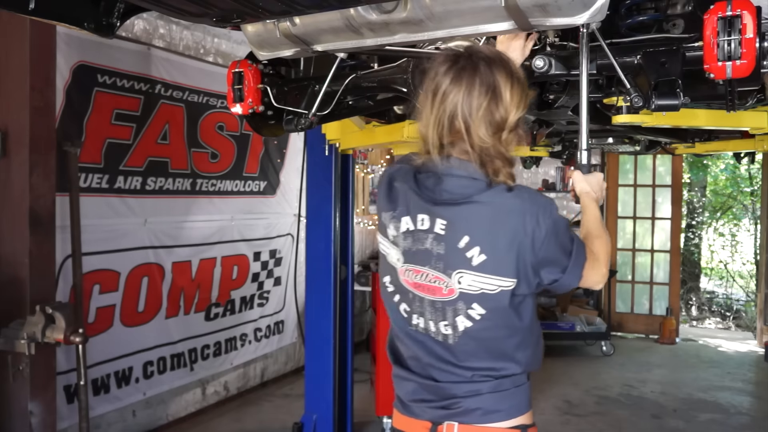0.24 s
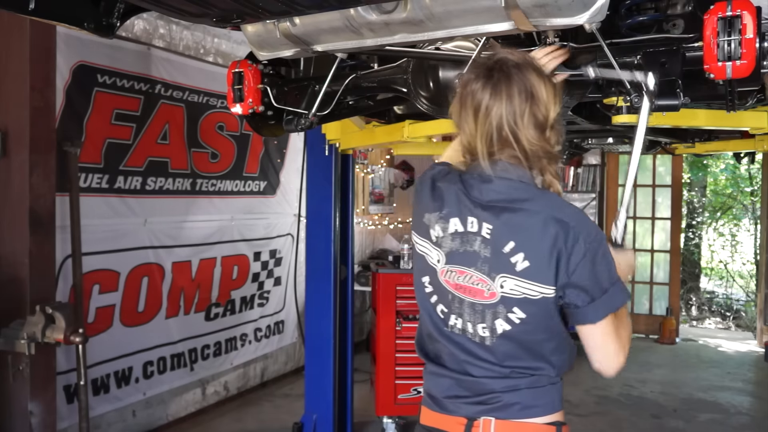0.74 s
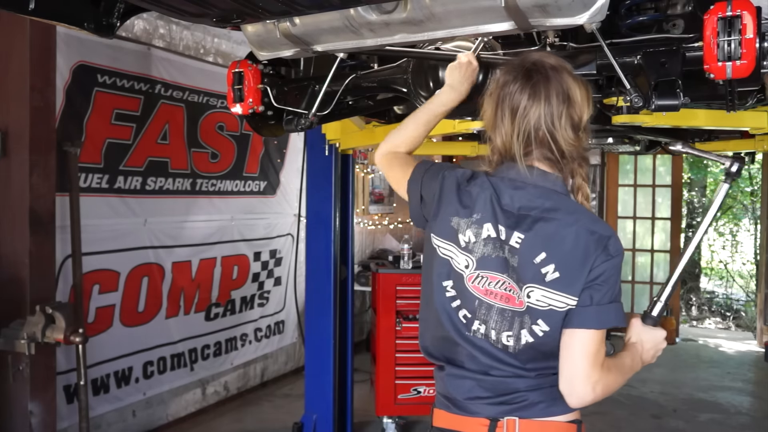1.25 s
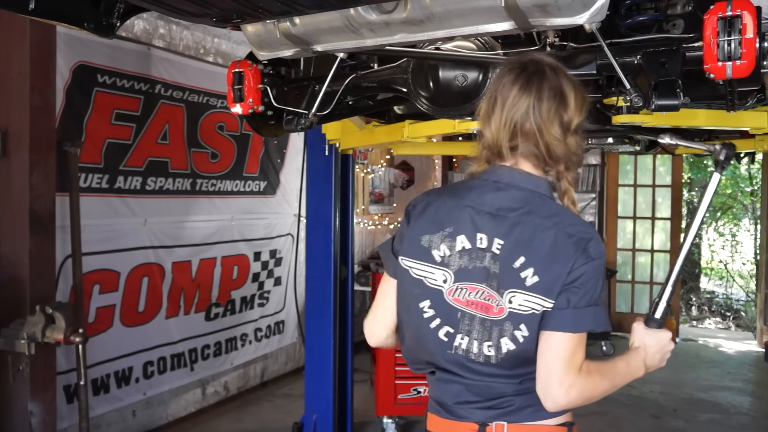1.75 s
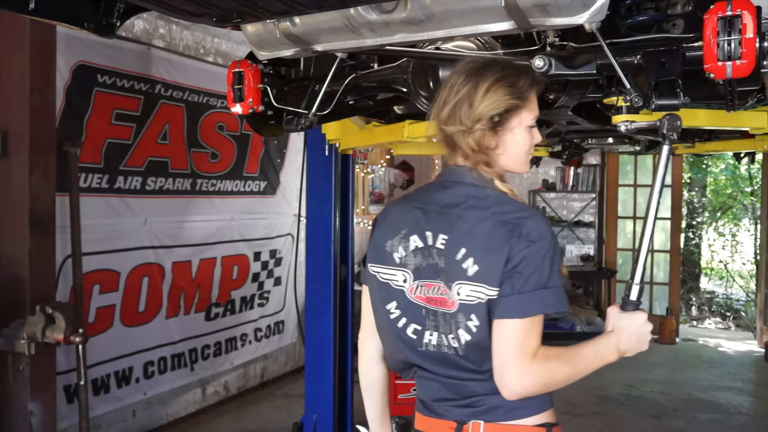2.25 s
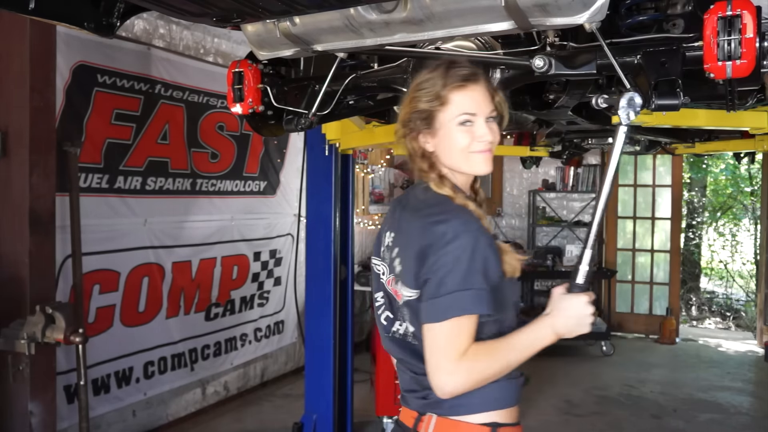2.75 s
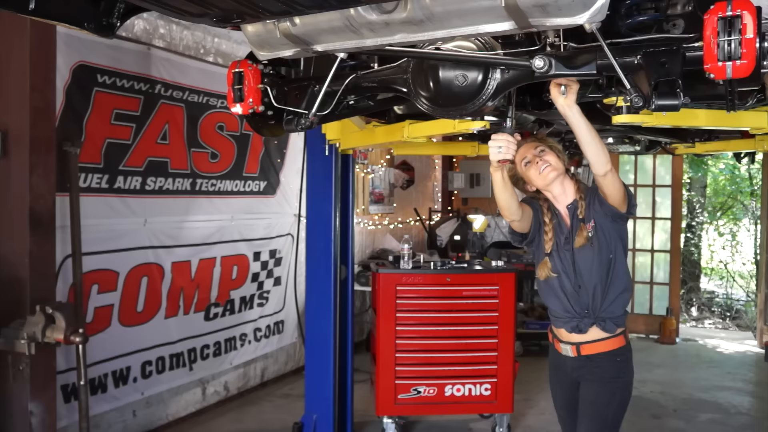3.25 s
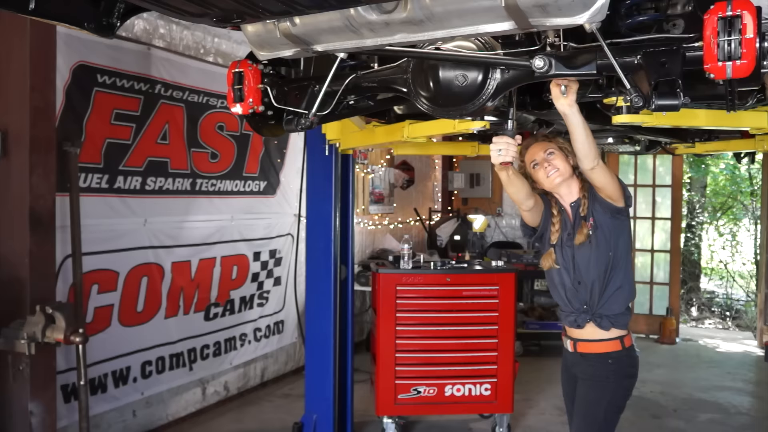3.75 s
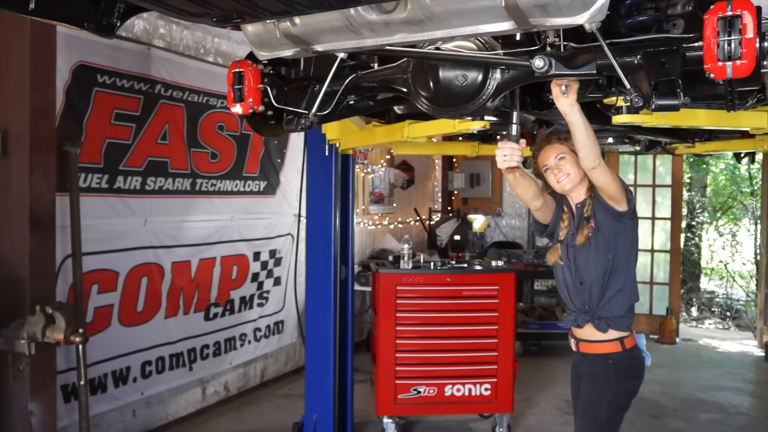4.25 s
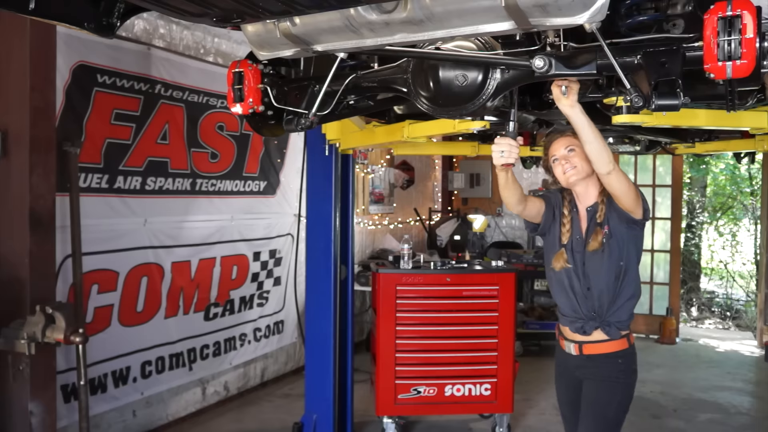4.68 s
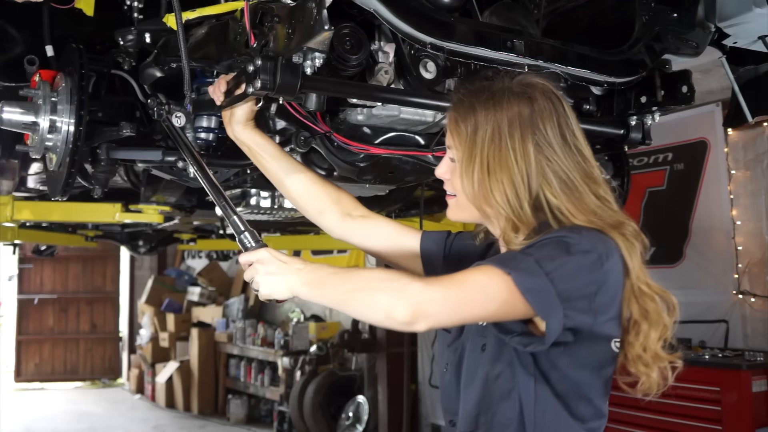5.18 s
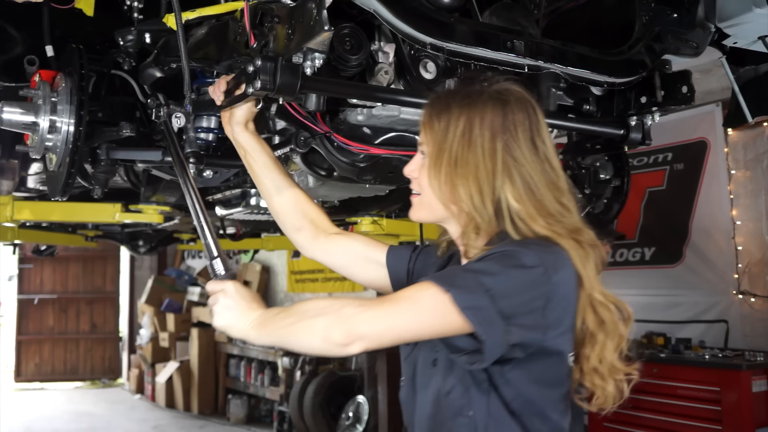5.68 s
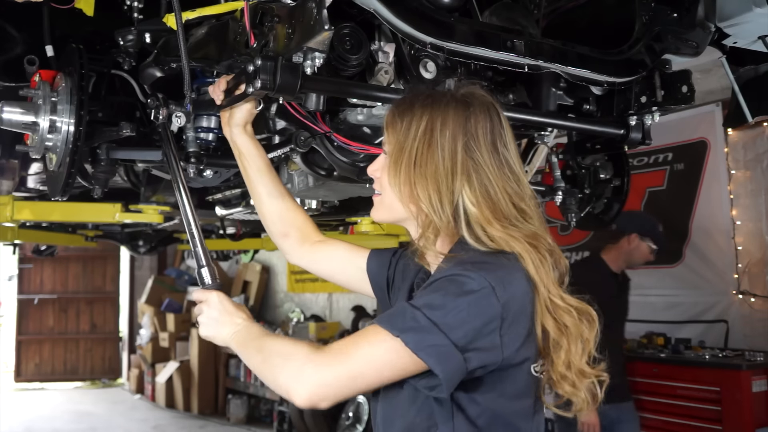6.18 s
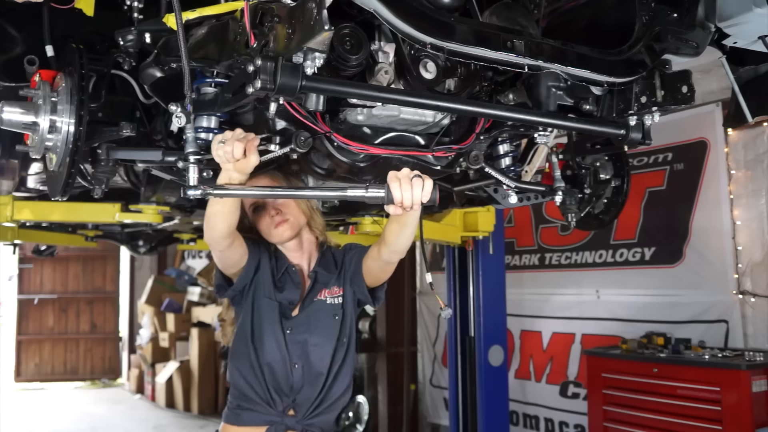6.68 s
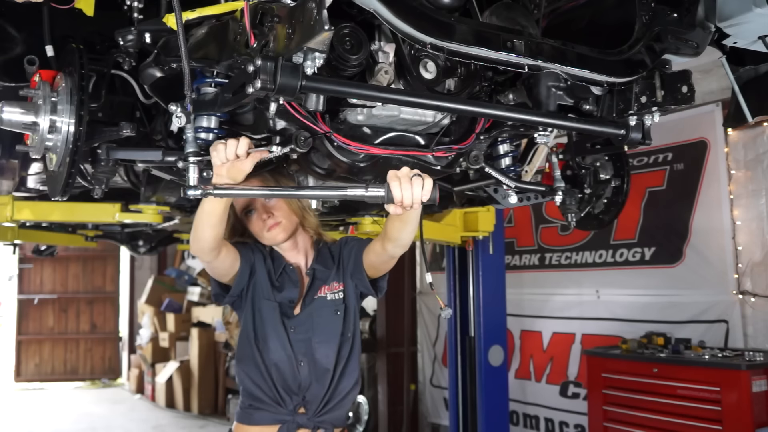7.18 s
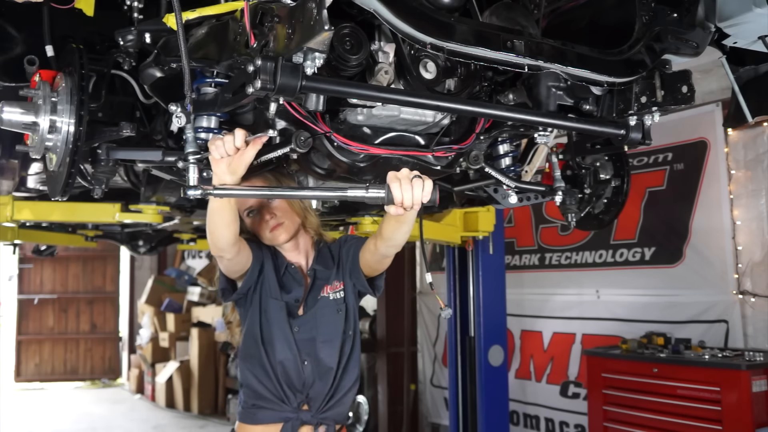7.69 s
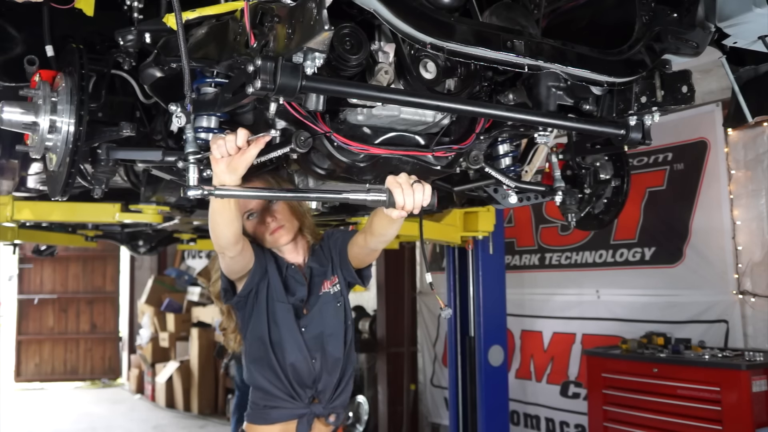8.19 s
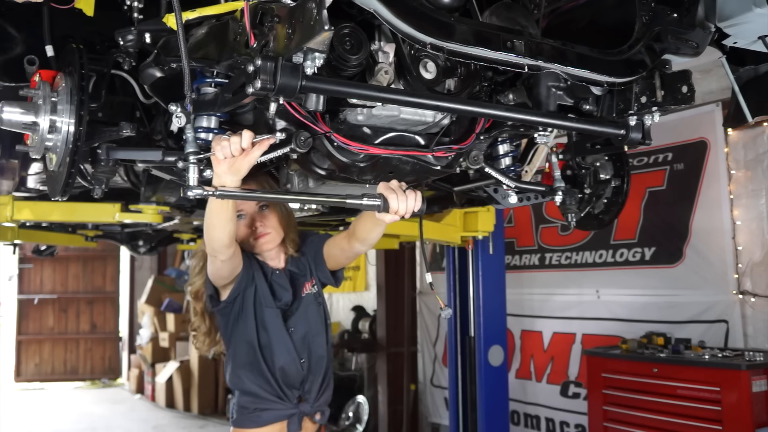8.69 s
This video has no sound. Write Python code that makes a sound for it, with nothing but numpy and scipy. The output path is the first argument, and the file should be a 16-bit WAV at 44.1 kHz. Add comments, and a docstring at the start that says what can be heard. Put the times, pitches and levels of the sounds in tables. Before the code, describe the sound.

Sharp steel clacks and clicks of a wrench, with brief ratchet rasps, in an open garage with birdsong and distant traffic rumble.

```python
"""In a garage with its door open, a click-type torque wrench tightens suspension bolts under a car on a lift.
The socket rings as it comes off a bolt, the wrench breaks over with sharp clacks that shake axle and frame,
and the ratchet rasps between pulls. Blows are shaped noise plus decaying modes; the rasp is filtered tooth clicks.
Birds are gliding tones and distant traffic is shaped noise, heard from four places in turn; tonal hums lie beneath."""
import sys
import numpy as np
from scipy import signal
from scipy.fft import rfft, irfft
from scipy.io import wavfile

SR = 44100
rng = np.random.default_rng(int(sys.argv[2]) if len(sys.argv) > 2 else 0)


def store_wav(level_fs):
    """Save 16-bit WAV to argv[1]."""
    pcm = np.round(np.clip(np.atleast_2d(level_fs), -1, 1) * 32767)
    wavfile.write(sys.argv[1], SR, pcm.T.astype(np.int16))


N = 393813
TIME = np.arange(N) / SR
TAIL = np.arange(36000) / SR  # time axis of one blow or reverberant tail
TOP_HZ = 11050  # upper limit of the sound

# Likeness of the two channels. Each row: frequency in Hz, side minus mid in dB.
WIDTH = [(100, -22), (250, -16.5), (600, -9.5), (1200, -9), (2500, -3.5), (5000, -2), (10000, -1)]
# Where the listener stands: door, rear axle, front, lift. Each row: start in seconds, background level in dB,
# drift in dB per second, flicker in dB, left minus right in dB.
PLACES = [(0, -49.5, 0, 2, 1.4), (3.285, -43, -2, 0, 2), (4.895, -54, .7, 0.7, 1), (6.1, -52, 0, 1.5, 1)]


def undb(db):
    """Amplitude ratio: 20 dB is a factor of ten."""
    return 10 ** (np.asarray(db) / 20)


def unit(x):
    """Normalization to a root mean square of 1."""
    return x / np.sqrt(np.mean(x ** 2))


def across(points, hz):
    """Linear interpolation of (Hz, value) points on a log-frequency axis."""
    f, value = np.transpose(points)
    return np.interp(np.log(np.maximum(hz, 1)), np.log(f), value)


def bins(size):
    """Discrete Fourier frequencies in Hz for this many samples."""
    return np.arange(size // 2 + 1) * SR / size


def shape(points, hz):
    """Spectral shaping: a band-limited gain that leaves white noise near rms 1."""
    return unit(undb(across(points, hz)) * (hz < TOP_HZ))


def panned(db, pan_db):
    """Level-difference stereo: left and right gains pan_db apart."""
    return undb(db + np.array([[pan_db], [-pan_db]]) / 2)


def stereo_spectrum(size, wide_db=0):
    """Diffuse-field coherence: two close microphones agree in the bass and differ in the treble."""
    mid, side = rfft(rng.standard_normal((2, size)))
    width = undb(np.minimum(across(WIDTH, bins(size)) + wide_db, 0))
    return np.array([mid + width * side, mid - width * side]) / np.sqrt(1 + width ** 2)


def octaves(spectrum, size):
    """Filter bank: overlapping octave bands, each given as (centre Hz, waveform)."""
    centres = np.geomspace(80, 10240, 8)
    for hz, pick in zip(centres, np.eye(len(centres))):
        weight = across(np.c_[centres, pick], bins(size))
        yield hz, irfft(spectrum * weight, size)


def walk(rate, t):
    """Slow random modulation: normal values joined by lines, rate of them per unit of t."""
    steps = rng.standard_normal(1024)
    return np.interp(t * rate, np.arange(len(steps)), steps)


def add(out, s, x):
    """Superposition: mix a sound in at s seconds."""
    i = max(int(s * SR), 0)
    out[:, i:i + x.shape[1]] += x[:, :N - i]


def fade(t60, hold):
    """Held, then free decay: level holds for hold seconds, then falls 60 dB in t60 seconds."""
    knee = np.exp(np.minimum(2 * np.log(1000) * (TAIL - hold) / t60, 200))
    return np.sqrt((1 + knee[0]) / (1 + knee))


def garage(x, wet_db, t60):
    """Reverberation: direct sound plus a decaying diffuse tail, at about unchanged power."""
    response = irfft(stereo_spectrum(len(TAIL))) * fade(t60, 0)
    response *= undb(wet_db) / np.sqrt(np.sum(response ** 2) / 2)
    response[:, 0] += 1  # direct sound
    return signal.fftconvolve(x[None], response, axes=1)[:, :N] / np.hypot(1, undb(wet_db))


def struck_gain(body, modes, tone_points, uneven_db):
    """Radiation of a struck body: its spectrum, tilted by the blow and raised around its modes."""
    hz = bins(len(TAIL))
    gain = shape(body, hz) * undb(across(tone_points, hz))
    # each blow favours its own share of the car's many small resonances
    gain = gain * undb(uneven_db * walk(1 / 45, hz)) / undb(uneven_db ** 2 / 13)
    # the blow's noise is stronger around each of the modes
    peaks = 1
    for f, mode_db, _ in modes:
        half_width = .011 * f + 12  # Hz
        peaks = peaks + 5 * undb(2 * mode_db) / (1 + ((hz - f) / half_width) ** 2)
    return gain * np.sqrt(peaks * np.sum(gain ** 2) / np.sum(peaks * gain ** 2))


def bloom(f, bloom_cycles):
    """Resonant build-up: low notes take longer to grow in the frame and the room."""
    return 1 - np.exp(-TAIL * f / bloom_cycles)


def clatter_noise(gain, hold, linger, bloom_cycles, wide_db):
    """Reverberant decay: noise fills the room and dies away at its own rate in each octave."""
    # Each row: frequency in Hz, decay time t60 in seconds before scaling by linger.
    room_t60 = [(120, 1), (300, 0.69), (700, 0.38), (1500, 0.31), (4000, 0.4), (11000, 0.5)]
    clatter = 0
    for f, band in octaves(stereo_spectrum(len(TAIL), wide_db) * gain, len(TAIL)):
        decay = fade(linger * across(room_t60, f), hold)
        clatter = clatter + band * decay * bloom(f, bloom_cycles)
    return clatter


def contact_crack(gain, crack_s, snap, wide_db, lead):
    """Impact: an impulse and a brief noise burst, high-passed, straight to the microphone."""
    hz = bins(len(TAIL))
    contact = irfft(stereo_spectrum(len(TAIL), wide_db)) * np.exp(-TAIL / crack_s)
    contact[:, 1] += snap
    # lead, in samples, leaves room for the zero-phase filter to spread backwards
    spectrum = rfft(np.roll(contact, lead, axis=1))
    return irfft(spectrum * gain * hz / np.hypot(hz, 1500)) * (TAIL < .1)


def modal_ring(modes, hold, bloom_cycles, wide_db):
    """Modal synthesis: the steel rings as a sum of wavering, decaying sinusoids."""
    ring = 0
    strength = np.sqrt(np.sum(undb(np.array(modes)[:, 1]) ** 2) / 2)
    for f, mode_db, t60 in modes:
        # reflections make each mode waver and reach the two sides out of step
        lag = rng.standard_normal((2, 1)) * undb(across(WIDTH, f) + wide_db)
        phase = 2 * np.pi * (f * TAIL + rng.random()) + lag + .7 * walk(45, TAIL)
        swell = bloom(f, bloom_cycles) * undb(mode_db + 0.81 * walk(70.0, TAIL))
        ring = ring + swell * fade(t60, hold) * np.sin(phase) / strength
    return ring


def blows(hits, body, modes, linger, crack_s, bloom_cycles, snap, uneven_db, wide_db, pan_db):
    """Impact excitation of steel: a direct crack, ringing modes and reverberant clatter."""
    out = np.zeros((2, N))
    lead = 128  # samples
    for s, db, bass_db, middle_db, treble_db, crack_db, hold, ring_db in hits:
        tone_points = [(300, bass_db), (1400, middle_db), (3600, 0), (8000, treble_db)]
        gain = struck_gain(body, modes, tone_points, uneven_db)
        clatter = clatter_noise(gain, hold, linger, bloom_cycles, wide_db)
        crack = contact_crack(gain, crack_s, snap, wide_db, lead)
        ring = modal_ring(modes, hold, bloom_cycles, wide_db)
        sides = panned(db, pan_db)
        add(out, s, sides * (clatter + undb(ring_db) * ring))
        add(out, s - lead / SR, sides * undb(crack_db) * crack)
    return out


def rear_clacks():
    """Sudden release of a loaded wrench: each break-over shakes the rear axle into ringing."""
    # Blows. Each row: start in seconds, level in dB, bass, middle, treble and crack in dB,
    # hold in seconds, ring in dB.
    hits = [(4.038, -20, 2, 2, 2, 0.77, 0.069, -7.5), (4.519, -19, -4, -3.5, -5.5, 6.7, 0.055, -13)]
    # Struck spectrum. Each row: frequency in Hz, relative density in dB per Hz.
    body = [(47, -60), (80, -29), (259, 1), (500, -10), (615, -5), (948, -7), (1370, -6.5), (1590, -7),
            (1990, -5), (2940, -10.5), (3770, -8), (4010, -10), (5690, -14), (10300, -14.5), (11000, -17)]
    # Ringing modes. Each row: frequency in Hz, relative level in dB, decay time t60 in seconds.
    modes = [(629, -4, .33), (760, -9, .3), (1135, -3, .33), (1367, 1, .3), (1745, -6, .45), (1873, -7, .4),
             (1950, -6, .4), (2024, -9, .4), (2556, -7, .4), (2632, -6, .45), (2804, -10, .45),
             (3250, -6, .35), (3477, -9, .38), (3705, -4, .36), (3738, -3, .36), (3784, -2, .4),
             (4436, -15, .32), (8320, -20, .5), (10640, -21, .5)]
    return blows(hits, body, modes, linger=1.0, crack_s=0.0068, bloom_cycles=2.9, snap=1.4,
                 uneven_db=1.5, wide_db=0, pan_db=0)


def front_clicks():
    """Sudden release at the front: break-overs excite the frame's low and high modes."""
    # Blows. Each row: start in seconds, level in dB, bass, middle, treble and crack in dB,
    # hold in seconds, ring in dB.
    hits = [(5.8318, -31, -0.5, 1.6, 9.5, 7.8, 0.081, -12.5),
            (6.1196, -26, -12, -0.2, -3.5, 13.3, 0.042, -12.5), (8.369, -29.5, -2, -0.5, 4, 14, 0.062, -10)]
    # Struck spectrum. Each row: frequency in Hz, relative density in dB per Hz.
    body = [(70, -9.5), (150, -11.5), (250, 0.5), (320, -3.5), (400, -12.5), (620, -9), (1000, -16),
            (1400, -11.5), (2800, -14.5), (3700, -13.5), (5100, -15.5), (6400, -14), (7150, -16.5),
            (8300, -15), (11000, -23.5)]
    # Ringing modes. Each row: frequency in Hz, relative level in dB, decay time t60 in seconds.
    modes = [(225, -4, .55), (268, -2, .55), (305, -2, .5), (446, -7, .45), (605, -3.5, .45),
             (1332, -4, .4), (1428, -5, .4), (1830, -7, .45), (1921, -5, .45), (1992, -6, .45),
             (2890, -8, .5), (3407, -6, .45), (3579, -1, .5), (3854, -8, .4), (3960, -7, .4),
             (4170, -9, .35), (6435, -6, .4)]
    return blows(hits, body, modes, linger=0.92, crack_s=0.0032, bloom_cycles=4.6, snap=3.2,
                 uneven_db=2.0, wide_db=1, pan_db=0.5)


def socket_hit():
    """Free vibration of a struck steel part: the socket rings as it comes off the bolt."""
    # Blows. Each row: start in seconds, level in dB, bass, middle, treble and crack in dB,
    # hold in seconds, ring in dB.
    hits = [(1.162, -20.5, 3.5, -5.5, -1, 11, 0.0014, -2)]
    # Struck spectrum. Each row: frequency in Hz, relative density in dB per Hz.
    body = [(80, -28), (350, 5.5), (450, -2.5), (700, 5.5), (2250, 4), (2650, -12.5), (3400, -4), (4080, 0),
            (4400, -21), (5100, -2.5), (6300, -23.5), (7100, -18), (9000, -23), (11000, -45)]
    # Ringing modes. Each row: frequency in Hz, relative level in dB, decay time t60 in seconds.
    modes = [(1372, -9, .3), (2944, -13, .3), (3326, -1.5, .36), (3779, -4, .22), (3990, -8, .2),
             (5049, -.5, .34), (5237, -8, .38), (7154, -21, .3), (8085, -9.5, .32), (8926, -15, .44),
             (10475, -28, .3)]
    return blows(hits, body, modes, linger=0.98, crack_s=0.013, bloom_cycles=0.88, snap=1.5,
                 uneven_db=0.0, wide_db=1.0, pan_db=0)


def head_knocks():
    """Repeated impact: the ratchet head bumps the bolt as it is pulled off."""
    # Blows. Each row: start in seconds, level in dB, bass, middle, treble and crack in dB,
    # hold in seconds, ring in dB.
    hits = [(1.05, -37, 1.5, 0, -20, -18, .015, -23), (1.064, -25.5, -5.5, 0, 4, -6, 0.0091, -15),
            (1.084, -24, -8, 0, -6, -12, .01, -14), (1.096, -23.5, -5, 0, 8, 0, .005, -11)]
    # Struck spectrum. Each row: frequency in Hz, relative density in dB per Hz.
    body = [(100, -9), (400, 2), (900, 6.5), (2000, -4.5), (2650, -8), (3400, -10), (4100, -9), (4500, -26),
            (5400, -26), (6200, -26), (11000, -44)]
    # Ringing modes. Each row: frequency in Hz, relative level in dB, decay time t60 in seconds.
    modes = [(909, 0, .35), (1959, -1, .3), (2944, -4, .3), (3332, -4, .4), (5065, -8, .3),
             (7046, -15, .25), (7165, -7, .27), (10486, -11, .25)]
    return blows(hits, body, modes, linger=0.6, crack_s=0.0033, bloom_cycles=1.6, snap=2.1,
                 uneven_db=7.0, wide_db=-3.0, pan_db=-1)


def swing(start, length):
    """Envelope of effort: a back swing gathers speed, is braked and stops."""
    part = (TIME - start) / length
    db = np.interp(part, [0, 0.45, 1], [-8.5, 0, -3])
    release_s = 0.021
    return (part > 0) * undb(db) * np.exp(-np.maximum(TIME - start - length, 0) / release_s)


def ratchet(teeth_per_s=190, scatter_db=4):
    """Impulse-train excitation: the pawl skips unevenly over the teeth as the handle swings back."""
    # Each row: start in seconds, length in seconds, rasp in dB, low knock of the teeth in dB.
    swings = [(6.687, 0.033, -42.5, -70), (6.777, 0.032, -37, -50), (6.845, 0.057, -37.5, -58),
              (7.373, 0.048, -46.5, -40.5), (7.433, 0.11, -35, -42)]
    # Spectra of rasp and knock. Each row: frequency in Hz, relative density in dB per Hz.
    rasp_body = [(760, -11), (1300, -3), (1530, -5), (2390, -3), (3120, -3), (3290, -1.5), (3600, -2.5),
                 (4460, -10), (5530, -8), (9970, -15), (11000, -17)]
    knock_body = [(250, -13), (420, -5), (560, 9), (750, -2), (1000, -18), (1500, -32), (2500, -52)]
    chance = rng.standard_normal((2400, 2))
    gaps = np.exp(.35 * chance[:, 0]) / teeth_per_s  # the median gap is 1 / teeth_per_s
    at = (np.cumsum(gaps) * SR).astype(int)
    teeth = np.zeros(N)
    teeth[at[at < N]] = undb(scatter_db * chance[at < N, 1])
    rasp = unit(irfft(rfft(teeth) * shape(rasp_body, bins(N)), N))
    knock = unit(irfft(rfft(teeth) * shape(knock_body, bins(N)), N))
    out = np.zeros(N)
    for s, length, rasp_db, knock_db in swings:
        out += swing(s, length) * (undb(rasp_db) * rasp + undb(knock_db) * knock)
    return garage(out, wet_db=11, t60=0.4)


def taps():
    """Weak impact: light knocks of tool and hands set the wrench ringing faintly."""
    # Blows. Each row: start in seconds, level in dB, bass, middle, treble and crack in dB,
    # hold in seconds, ring in dB.
    hits = [(0.0, -44, 11, -9, 3.5, -10, .005, -27), (.373, -38.5, -7, -0.5, -16, 7.5, .005, -23),
            (.4078, -38, -11, -1, 5.5, 11, .002, -14), (5.416, -45, 9.5, -19, -1, 2, .005, -22),
            (5.627, -36, 4.5, -6.5, -5.5, 1, 0.032, -11), (5.699, -39, 3, -4, -12, 4, 0.0086, -11),
            (6.419, -37.5, -20, -29, 9, 3.5, .003, -20), (6.468, -54, -11, 8.5, -9.5, 10, .005, -16),
            (6.598, -47.5, -5, -6, 1, -7, 0.015, -9), (6.643, -42, -22.5, -3.5, -1, 0, 0.011, -12),
            (7.136, -46.5, 7.5, 0, 1, 11.5, .003, -10), (7.206, -38.5, -6, -14, -7, 13.5, 0.0036, -16),
            (7.38, -43, 9, -3, -14, 1, .01, -24), (7.433, -39.5, -5.5, -14, -0.5, 5, .003, -15)]
    # Struck spectrum. Each row: frequency in Hz, relative density in dB per Hz.
    body = [(100, -15), (300, -4.5), (700, 4), (1800, 4.5), (4000, -0.5), (7000, -6), (11000, -11.5)]
    # Ringing modes. Each row: frequency in Hz, relative level in dB, decay time t60 in seconds.
    modes = [(1766, -7, 0.26), (2000, -9.5, 0.68), (2480, -4, 0.29), (3740, -21, 0.14), (4860, -6.5, 0.094)]
    return blows(hits, body, modes, linger=0.81, crack_s=0.0059, bloom_cycles=3.7, snap=4.4,
                 uneven_db=4.0, wide_db=1.0, pan_db=-0.5)


def whistles(notes, wet_db, t60):
    """Frequency modulation: whistles glide in pitch, huskier in wide glides; the garage smears them."""
    out = np.zeros((1, N))
    for s, length, start_hz, end_hz, db in notes:
        t = np.arange(int(length * SR)) / SR
        husk = (15 + abs(end_hz - start_hz) ** 2 / 5000) * walk(1100, t)
        # the glide slows towards the end pitch and stops a little short of it
        hz = start_hz + (end_hz - start_hz) * np.tanh(1.4 * t / length) / np.tanh(1.8) + husk
        envelope = np.sqrt(2 * np.sin(np.pi * t / length))
        note = undb(db) * envelope * np.sin(2 * np.pi * np.cumsum(hz) / SR)
        add(out, s, note[None])
    return garage(out[0], wet_db, t60)


def twitter(count=14):
    """Random scattering: faint notes of more distant birds until the listener moves to the front."""
    when, pitch, slide = rng.uniform(-1, 1, (count, 3)).T
    starts = (when + 1) / 2 * PLACES[2][0]
    pitches = 2800 * 2 ** (0.33 * pitch)  # Hz, within a third of an octave
    return [(s, .06, f, f * (1 + .08 * k), -66.5) for s, f, k in zip(starts, pitches, slide)]


def birds():
    """Direct and reverberant song: scattered calls behind the car, then a near bird repeats its phrase."""
    # Notes of one phrase. Each row: delay in seconds, length in seconds, start and target pitch in Hz,
    # relative level in dB.
    phrase = [(0, .04, 2600, 2680, -1), (.058, .07, 2660, 3020, 2.5), (.155, .05, 3350, 4400, -.5),
              (.245, .04, 7200, 6100, -10), (.305, .05, 2000, 2370, -8)]
    # When the phrase is sung. Each row: start in seconds, level in dB.
    song = [(6.958, -46.5), (7.31, -43), (7.667, -47.5), (8.02, -46), (8.386, -50)]
    # Other birds. Each row: start in seconds, length in seconds, start and target pitch in Hz, level in dB.
    calls_far = [(0, 0.096, 2626, 2520, -54.5), (.97, 0.045, 2500, 2700, -53),
                 (1.9, 0.087, 2700, 2490, -55), (2.86, 0.13, 3420, 3350, -56),
                 (2.95, 0.061, 2360, 2470, -54.5), (3.79, 0.042, 3430, 3100, -55),
                 (3.86, 0.046, 5130, 4120, -59), (3.97, 0.034, 2730, 2530, -51.5),
                 (4.46, 0.043, 2670, 2940, -55), (4.79, 0.056, 3450, 3270, -49.5)]
    near = []
    for s, db in song:
        for after, length, start_hz, end_hz, note_db in phrase:
            near.append((s + after, length, start_hz, end_hz, db + note_db))
    behind = TIME < PLACES[2][0]
    far = whistles(list(calls_far) + twitter(), wet_db=11.0, t60=0.51)
    return whistles(near, wet_db=4.5, t60=0.54) + behind * far


def hum(hz, waver):
    """Random frequency modulation: a wavering sine at rms 1."""
    return unit(np.sin(2 * np.pi * np.cumsum(hz * (1 + waver * walk(60, TIME))) / SR))


def low_hum():
    """Amplitude modulation: a low wavering tone comes in a few swells."""
    # Each row: start in seconds, length in seconds, mean pitch in Hz, level in dB.
    swells = [(3.282, 0.22, 147, -43), (3.562, 0.15, 152, -43), (3.724, .15, 153.6, -44.5),
              (3.975, .06, 151.8, -45)]
    attack_s, release_s = 0.014, 0.033
    out = np.zeros(N)
    for s, length, hz, db in swells:
        envelope = np.clip(np.minimum((TIME - s) / attack_s, (s + length - TIME) / release_s), 0, 1)
        out += undb(db) * envelope * hum(hz, waver=0.022)
    return out


def far_whine():
    """Exponential decay: a faint far whine loses 5 dB each second."""
    return undb(-56 - 5 * TIME) * hum(797, waver=0.043)


def air(spectrum, end, start, db, drift_db_per_s, flicker_db, pan_db):
    """Coloured noise: traffic and room air at one place, drifting in level, each octave wavering."""
    out = np.zeros((2, N))
    size = 196608  # samples, longer than the stay at any place
    t = np.arange(size) / SR
    noise = 0
    for _, band in octaves(stereo_spectrum(size) * shape(spectrum, bins(size)), size):
        noise = noise + band * undb(flicker_db * walk(8.17, t))
    close = np.clip((end - start - t) / 0.0017, 0, 1)
    add(out, start, noise * panned(db + drift_db_per_s * t, pan_db) * close)
    return out


def background():
    """Ambient noise: the air of each place in turn, with distant traffic swelling at the door."""
    # Air at each place. Each row: frequency in Hz, relative density in dB per Hz.
    door_air = [(15, -54), (25, -23), (64, -6.5), (118, 0.5), (254, -6.5), (588, -15), (759, -8),
                (1060, -8), (2160, -24), (2450, -23.5), (3160, -28.5), (3410, -28.5), (4180, -32.5),
                (5970, -33.5), (11000, -42)]
    axle_air = [(15, -56), (25, -35), (59, -8.5), (118, -4.5), (149, -2.5), (182, -6.5), (274, -9.5),
                (559, -16), (1000, -15), (1330, -22), (2270, -36), (3240, -34), (3590, -38.5), (4630, -39),
                (11000, -46.5)]
    front_air = [(15, -35), (25, -17), (77, -1.5), (124, -3), (192, -4.5), (281, -12.5), (327, -8.5),
                 (422, -10.5), (635, -14), (1060, -12), (1800, -20.5), (3500, -22.5), (4990, -27.5),
                 (5530, -21), (11000, -37)]
    lift_air = [(15, -57), (25, -18), (141, 2.5), (260, -5), (372, -13.5), (401, -11.5), (979, -9.5),
                (1230, -7.5), (1470, -18.5), (1850, -16.5), (2510, -19), (2930, -16), (11000, -34)]
    spectra = (door_air, axle_air, front_air, lift_air)
    ends = [place[0] for place in PLACES[1:]] + [N / SR]
    door, axle, front, lift = (air(spectrum, end, *place)
                               for spectrum, end, place in zip(spectra, ends, PLACES))
    peak_s, width_s, swell_db = 2.44, 1.37, 3
    traffic = undb(swell_db * np.exp(-((TIME - peak_s) / width_s) ** 2))
    return traffic * door + axle + front + lift


def scene():
    """Superposition: wrench work over birds, hums and background."""
    wrench = rear_clacks() + front_clicks() + socket_hit() + head_knocks() + ratchet() + taps()
    hums = low_hum() + far_whine()  # the same in both channels
    return wrench + birds() + hums + background()


def record(dry):
    """Band limiting: a steep elliptic low-pass removes the extreme treble."""
    return signal.sosfilt(signal.ellip(10, .2, 70, TOP_HZ, fs=SR, output="sos"), dry)


dry = scene()
out = record(dry)
store_wav(out)
```